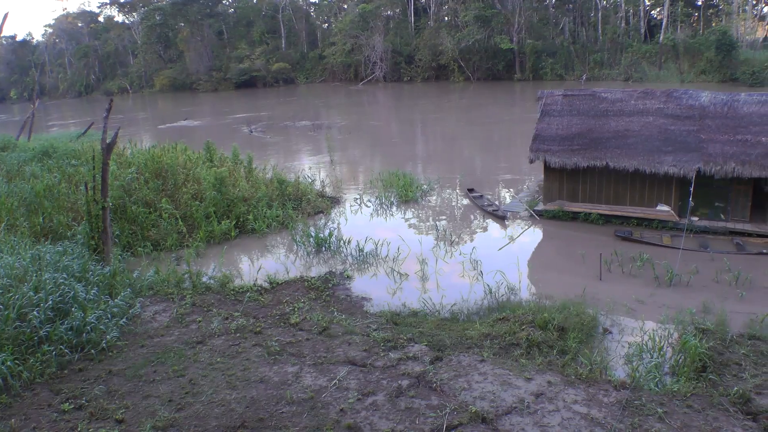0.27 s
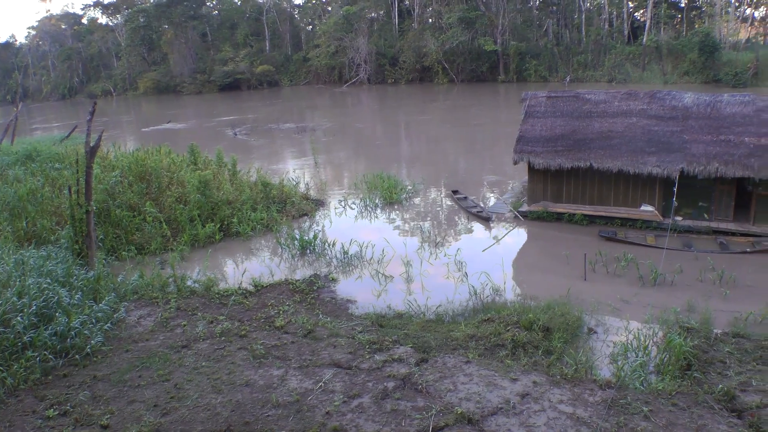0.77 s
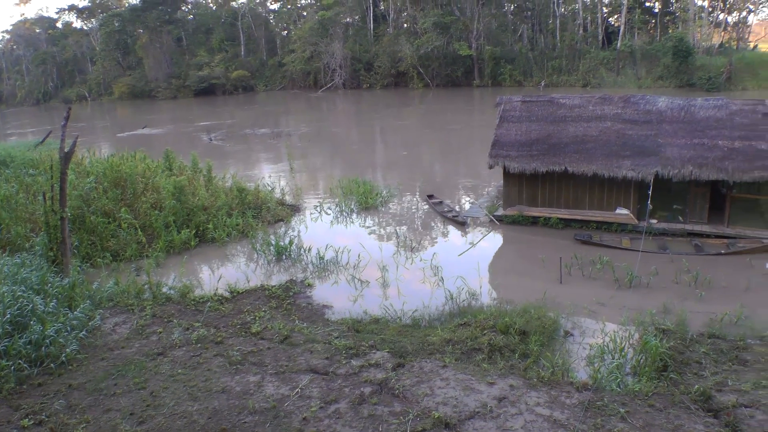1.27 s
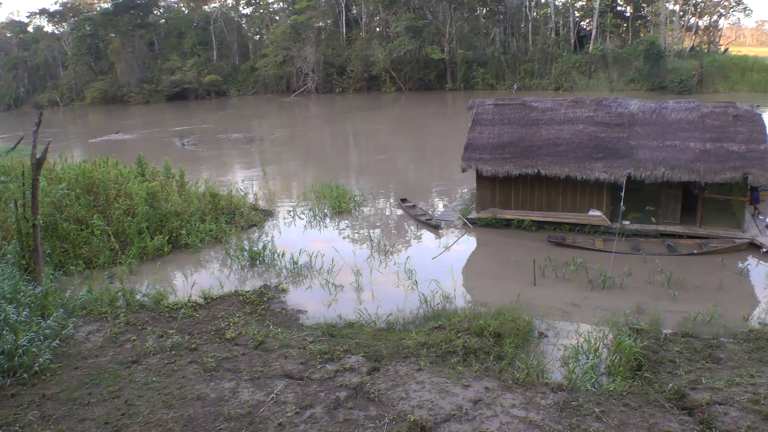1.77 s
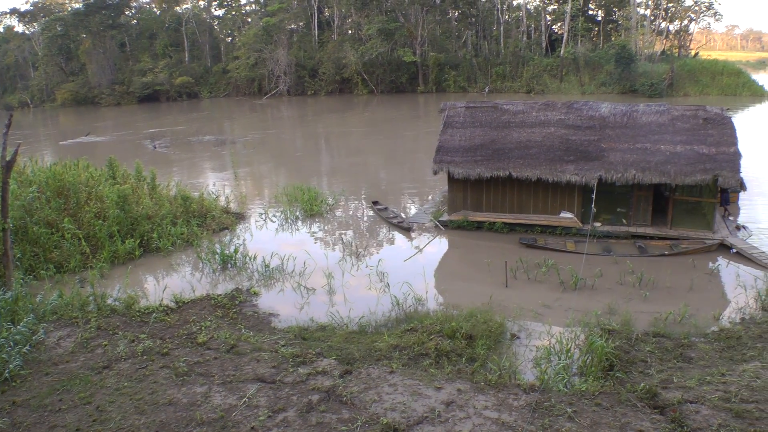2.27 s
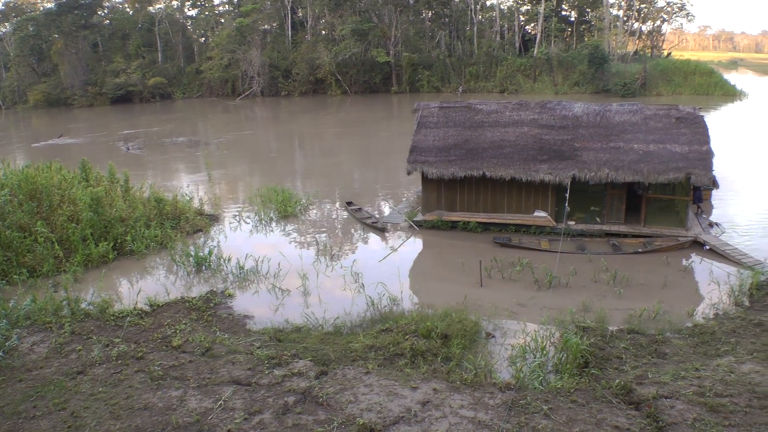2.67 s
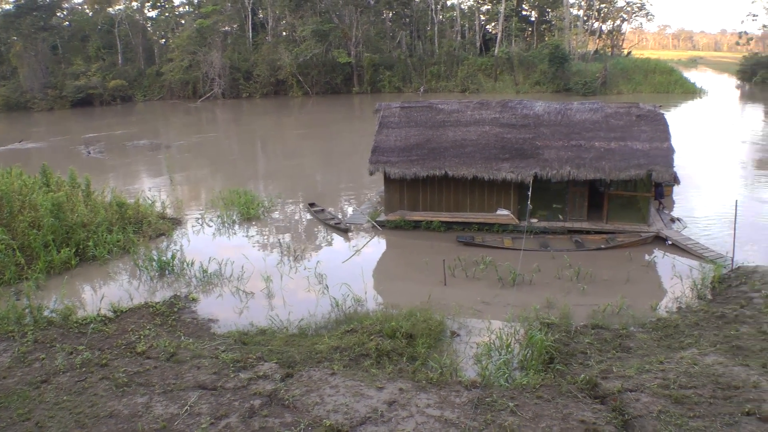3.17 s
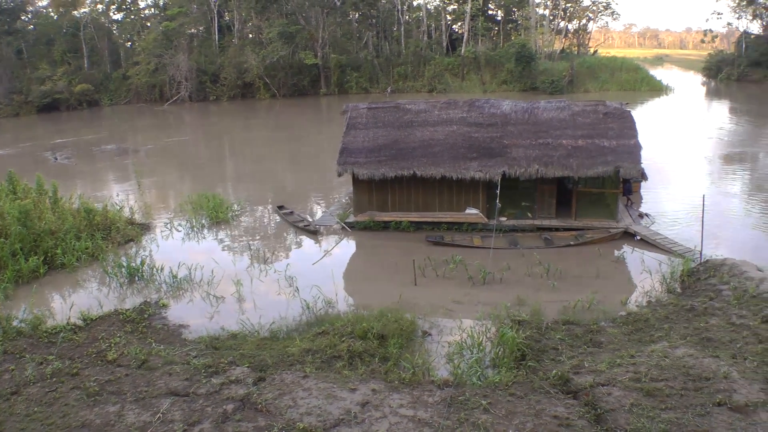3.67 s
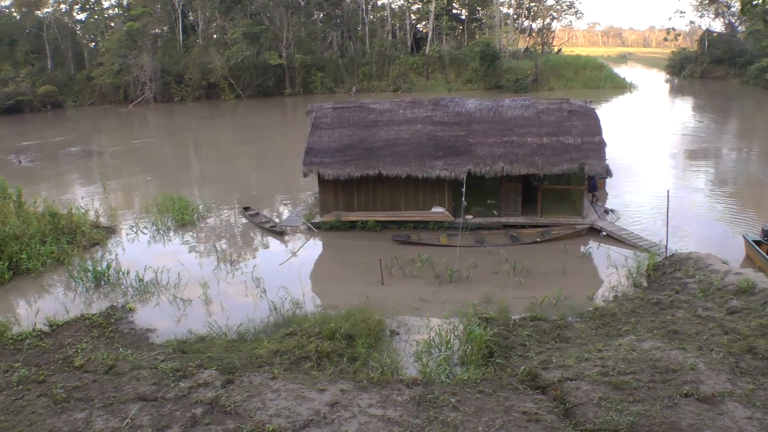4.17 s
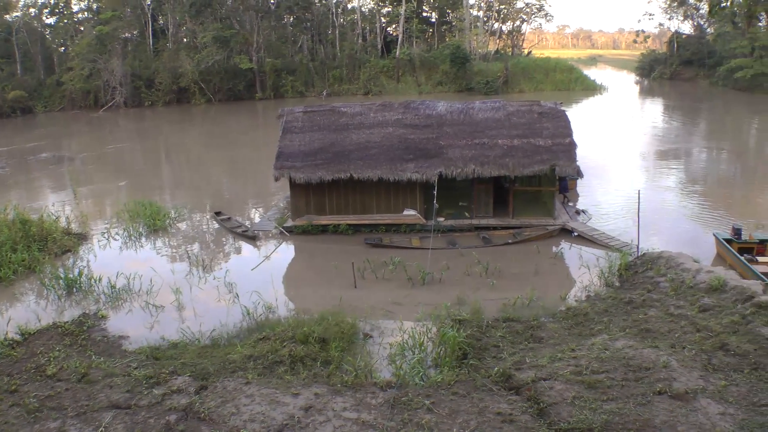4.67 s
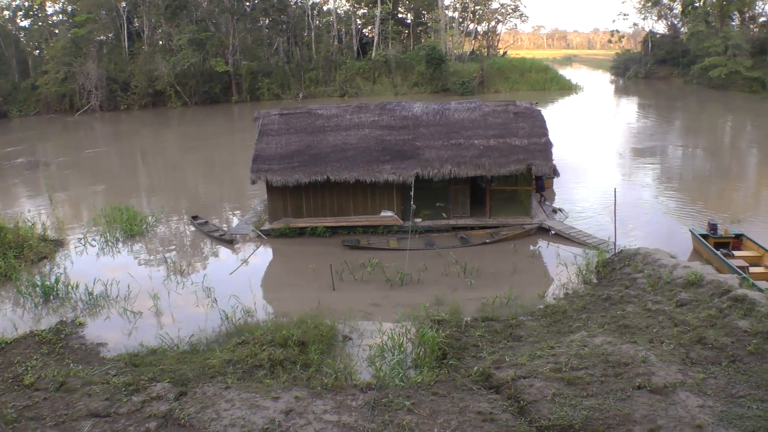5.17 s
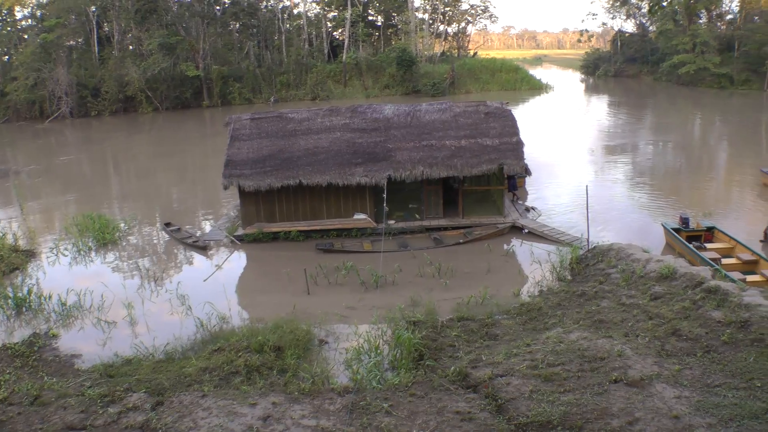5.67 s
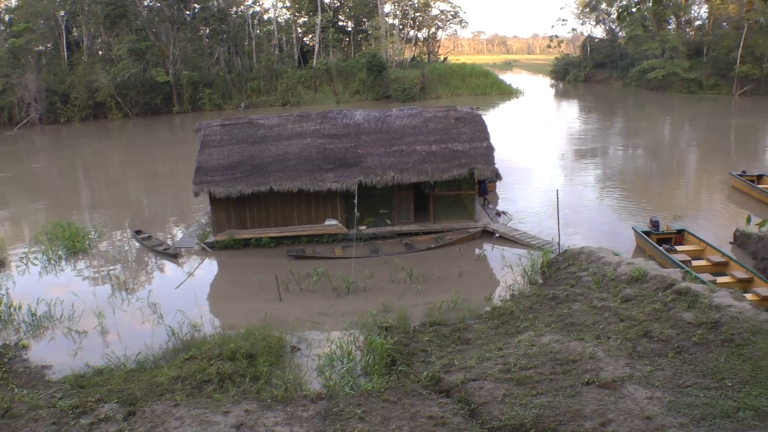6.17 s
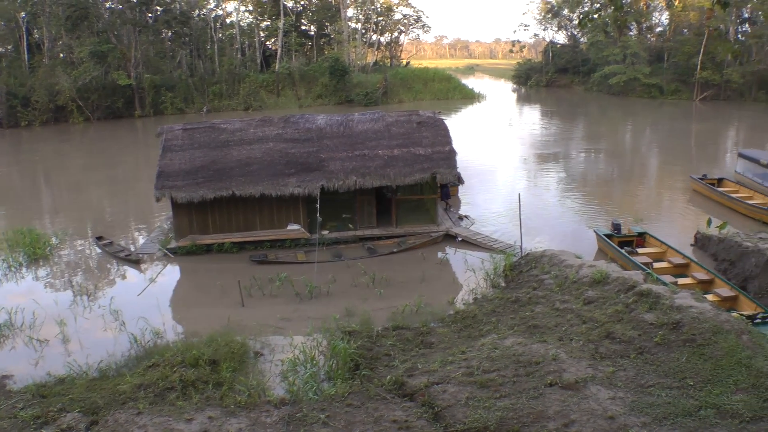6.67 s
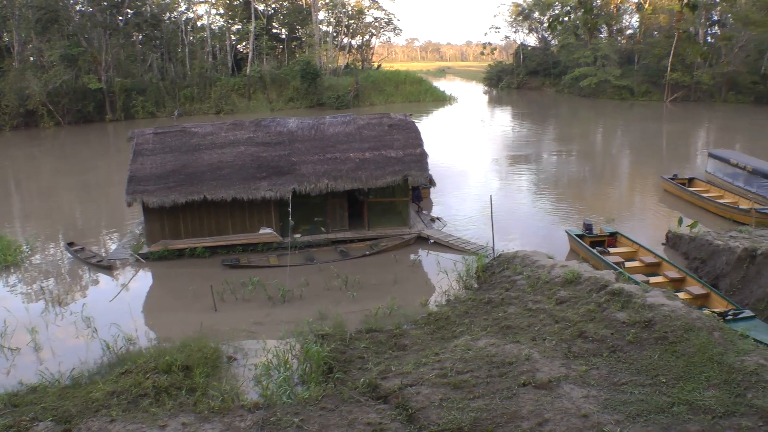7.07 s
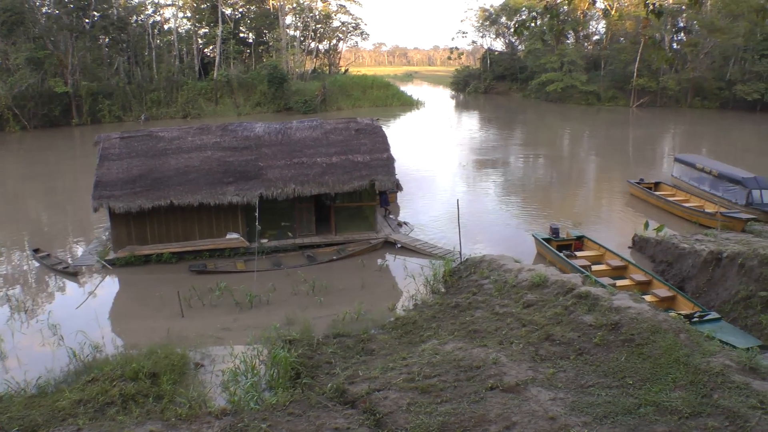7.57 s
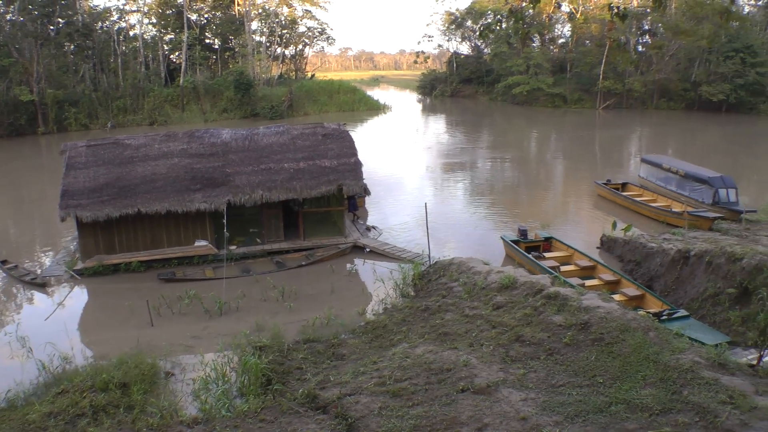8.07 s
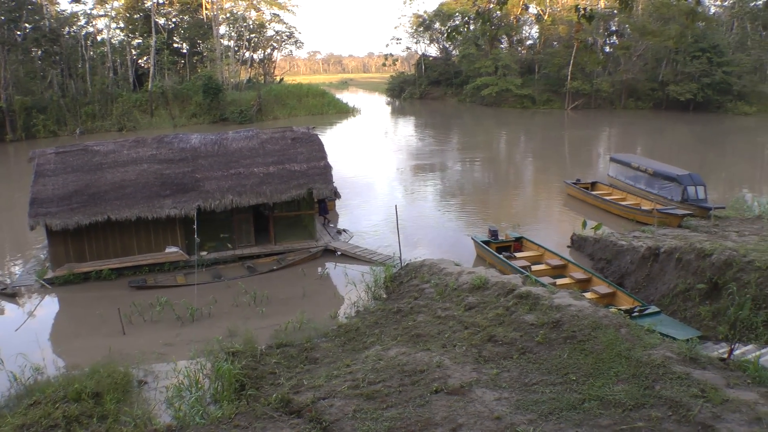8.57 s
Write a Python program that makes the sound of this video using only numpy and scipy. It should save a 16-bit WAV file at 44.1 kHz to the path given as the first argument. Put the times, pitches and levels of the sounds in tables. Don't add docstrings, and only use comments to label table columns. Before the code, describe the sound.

Dawn on a forest river bank, heard by a stereo outdoor microphone. After a brief silence, a near bird screams at 0.1 and 0.6 s, each cry sagging in pitch, then flipping up and breaking, with quick chatter and chirps around them. A falling yelp comes at 1.1, twitter at 1.7, short whistles at 2.1 and 2.4 with a bright snap between. Rough squawks, low and high, crowd 2.6-4.1, with faint trills. Tiny flock chirps fill 4.5-5.1; a croak and breathy rasps overlap from 5.1 to 6. Another squawk at 6.6, loud beak snaps and a harsh scrape at 6.7-7.0, then clear and hoarse piping and a flute-like call at 7.0-7.6. Faint peeps follow; a hoarse squawk and long fading rasp end it from 8.45. Beneath: steady high insect buzz, echoing far birds, soft air, low hum and two gentle wind gusts, at the start and 3.4.

```python
import sys
import numpy as np
from scipy import signal
from scipy.fft import rfft, irfft, next_fast_len
from scipy.io import wavfile
from scipy.ndimage import uniform_filter1d

SR = 44100
rng = np.random.default_rng(int(sys.argv[2]) if len(sys.argv) > 2 else 0)


def volts_from_decibels(level):
    exponent = np.asarray(level, float) / 20
    return 10 ** exponent


def materialize(psi):
    bounded = np.clip(np.atleast_2d(psi).T, -1, 1)
    quanta = np.round(bounded * 32767).astype(np.int16)
    wavfile.write(sys.argv[1], SR, quanta)


N = 388962

# start_s, flip_after_s, level_db, lowest_hz, lowest_at (share of the hold, 0-1)
SCREAMS = [
    (.128, .337, -27, 1131, .39),
    (.592, .353, -27.5, 1094, .45),
]
# centre_hz, lift_db
SCREAM_COLOURS = [
    (2300, -5),
    (2210, 2.5),
]
# freq_hz, level_db (per Hz)
SCREAM_THROAT = [(530, -24), (1150, -28), (1770, -11.5), (2220, -6), (2860, -9.5), (3140, -1.5), (3340, -3),
                 (3990, -7.5), (4500, 0), (5060, -4), (6820, -11.5), (11100, -26), (13300, -26.5),
                 (15500, -45)]
# start_s, length_s, peak_db, start_hz
YELP = (1.085, .115, -35, 2210)
# start_s, grace_s, length_s, level_db, held_hz
WHISTLES = [
    (2.13, 0.041, 0.118, -34, 1454),
    (2.401, 0.025, 0.129, -32.5, 1427),
]
# freq_hz, level_db (per Hz)
WHISTLE_THROAT = [(1450, -20.5), (2900, -1.5), (4350, -24), (5800, -41), (9000, -94)]
# start_s, length_s, peak_db, top_hz, roughness (0-1)
PIPES = [
    (7.043, .125, -31, 3200, .35),
    (7.278, .085, -22, 3050, .8),
]
# freq_hz, level_db (per Hz)
PIPE_THROAT = [(1500, -26.5), (2400, -1), (3050, 12), (3800, -8), (5000, 5), (6200, 7), (9300, -9),
               (14000, -30)]
# time_s, level_db, pitch_hz, roughness (0-1)
FLUTE = [(7.335, -43, 2056, .3), (7.359, -32, 1935, 0), (7.377, -21, 1926, 0.03), (7.393, -27.5, 1817, 0.3),
         (7.405, -23, 1801, 0.16), (7.422, -20, 1784, 0.04), (7.452, -30, 1754, 0.2),
         (7.47, -23.5, 1794, 0), (7.487, -24.5, 1786, 0.1)]
# time_s, level_db, pitch_hz, roughness (0-1)
FLUTE_LIFT = [(7.496, -37, 1906, 0.3), (7.523, -37.5, 1924, 0.4), (7.546, -32, 1931, 0.2),
              (7.565, -37, 1866, .14), (7.585, -60, 1720, .1)]
# time_s, level_db, pulse_rate_hz, roughness (0-1)
SQUAWKS = [
    [(2.621, -40, 529, 0), (2.64, -33, 789, 0.1), (2.665, -27, 878, 0.15), (2.69, -29.5, 922, 0.8),
     (2.735, -34.5, 876, 1), (2.77, -53, 870, 0.4)],
    [(3.058, -36, 310.7, 0.2), (3.072, -32, 390, 0.06), (3.09, -25, 459, 0.2), (3.118, -28.5, 478.7, 0.42),
     (3.142, -29, 292, 0.5)],
    [(3.143, -33, 862, .6), (3.18, -32.5, 1148, 0.55), (3.197, -31, 1171, 0.66), (3.235, -32.5, 822, 0.94),
     (3.255, -38, 796, 0.43), (3.28, -36, 907, 0.54), (3.325, -45, 946, 0.64)],
    [(3.39, -35, 352, 0.04), (3.41, -30.5, 473, 0.31), (3.46, -25, 477, 0.54), (3.478, -29, 468, 0.9)],
    [(3.47, -25.5, 339, 0.77), (3.51, -25, 353.7, 0.75), (3.555, -26.5, 359, 0.82), (3.585, -36, 297, 0.7),
     (3.62, -42, 235, .5)],
]
# time_s, level_db, pulse_rate_hz, roughness (0-1)
LATE_SQUAWKS = [
    [(3.798, -45, 398.6, 0.4), (3.82, -28, 468, 0.34), (3.855, -23, 477.4, 0.56), (3.9, -33.5, 414, 0.83),
     (3.93, -38, 394, 0.4)],
    [(3.99, -34, 560, 0.1), (4.015, -26.5, 1037, 0.33), (4.04, -27, 1301, 0.67), (4.07, -33.5, 1186, 0.43),
     (4.09, -39, 1044, 0.5), (4.11, -48, 830, 0.5)],
    [(5.991, -37, 481, 0.4), (5.997, -33, 521, 0.5), (6.08, -44.5, 450, 0.5), (6.17, -41, 341, 0)],
    [(6.565, -44, 712, 0.3), (6.585, -34, 877, 0.07), (6.605, -33.5, 1000, 0.63), (6.65, -35, 1023, 0.8),
     (6.715, -39, 998, 0.96)],
    [(8.452, -42, 471, 0.77), (8.459, -37, 558.4, 0.76), (8.49, -29.5, 698, 0.8), (8.53, -29, 704, 0.74),
     (8.59, -37, 714, 0.7), (8.68, -48, 717, .5)],
]
# centre_hz, lift_db
SQUAWK_COLOURS = [(3100, 5.5), (3020, 3), (2300, 1), (2300, 0), (2500, 1.5), (2900, 1.5), (2500, 3),
                  (2500, -2.5), (3000, 3), (2950, 6)]
# freq_hz, level_db (per Hz)
SQUAWK_THROAT = [(350, -46), (600, -21.5), (716, -26), (1010, -27.5), (1390, -14.5), (1530, -19),
                 (1730, -4), (2440, 0), (2950, -1), (3470, -0.5), (3980, -7.5), (5660, -7), (9500, -18),
                 (14100, -33), (15500, -46)]
# start_s, length_s, level_db, start_hz, end_hz
TRILLS = [
    (3.705, 0.11, -40.5, 1312, 1183),
    (3.948, 0.05, -41.5, 1294, 1243),
    (4.25, .145, -44, 1301, 1170),
    (6.396, 0.22, -42, 2340, 2250),
]
# freq_hz, level_db (per Hz)
TRILL_THROAT = [(1250, -6), (2500, 7), (3750, 1.5), (5000, 6.5), (6300, -10), (9000, -31), (13000, -40)]
# start_s, length_s, peak_db, throat_hz, peak_at (share of the length, 0-1)
RASPS = [(4.803, 0.1, -42, 3800, 0.37), (7.302, 0.098, -28.5, 2980, 0.24), (5.061, .4, -36, 3330, 0.26),
         (5.45, 0.24, -31, 3200, 0.4), (5.38, .29, -35, 4120, .4), (5.813, 0.21, -33.5, 3220, 0.21),
         (8.5, 0.77, -32.5, 3190, 0.032), (1.685, 0.23, -47, 3770, 0.37), (7.309, .03, -25, 2970, 0.46)]
# time_s, level_db
CROAK = [(5.2, -43.5), (5.314, -38), (5.51, -37.5)]
# freq_hz, level_db (per Hz)
CROAK_THROAT = [(590, -66), (1000, -24), (1540, -27), (1930, 1.5), (2340, 0), (3940, 0), (6270, -9),
                (7020, -17), (7770, -19), (8710, -19), (15000, -42)]
# time_s, level_db
SCRAPE = [(6.73, -36), (6.948, -29), (7.01, -50)]
# freq_hz, level_db (per Hz)
SCRAPE_THROAT = [(290, -57), (500, -31), (726, -6), (888, -23.5), (1130, -8.5), (1530, -11.5), (1800, -8.5),
                 (2500, -16), (3430, 2), (4840, -2), (6640, -3.5), (8240, -16), (10000, -16.5),
                 (14000, -28), (15500, -48)]
# time_s, peak_db
CHATTER = [(.231, -35), (0.254, -35), (0.27, -31), (.289, -37), (0.305, -26.5), (0.322, -36),
           (0.334, -26.5)]
# start_hz, end_hz, length_s
CHATTER_NOTE = (2500, 1100, 0.017)
# time_s, peak_db
PEEPS = [(7.654, -59), (7.8, -59), (7.925, -57), (8.065, -53.5), (8.199, -57)]
# start_hz, end_hz, length_s
PEEP_NOTE = (1515, 1200, 0.0473)
# time_s, peak_db, start_hz, end_hz
TWITTER = [(1.708, -36, 2700, 2850), (1.713, -37, 4680, 4550), (1.726, -31.5, 4170, 3380),
           (1.75, -32, 4700, 4270), (1.781, -30, 3750, 3470), (1.8, -34.5, 2570, 2300),
           (1.814, -34, 4980, 3570)]
# time_s, peak_db, start_hz, end_hz, length_s
GULPS = [(0.367, -44.5, 932, 937, 0.086), (1.127, -49, 802, 786, 0.031), (4.31, -47, 200, 187, 0.037),
         (4.463, -44.5, 248, 298, 0.024), (4.964, -48.5, 392, 473, 0.028), (5.091, -42, 600, 455, 0.018),
         (5.489, -48, 899, 972, 0.075), (5.667, -50, 396, 485, 0.032), (5.771, -40.5, 582, 598, 0.028),
         (6.022, -42, 960, 740, 0.035)]
# time_s, peak_db, start_hz, end_hz, length_s
CHIRPS = [(0.357, -34.5, 1720, 910, 0.017), (.376, -45, 1500, 880, 0.014), (0.444, -26, 1350, 1875, 0.032),
          (.468, -41, 1900, 1300, 0.011), (.478, -30, 1812, 1296, 0.052), (.515, -53, 1300, 622, 0.025),
          (.525, -39, 1490, 1335, 0.023), (1.093, -35, 6600, 6000, 0.029), (1.115, -32, 6050, 4950, 0.022),
          (2.35, -42, 4290, 2390, 0.02), (.922, -25.5, 1400, 1840, .04), (5.72, -45.5, 4740, 4840, 0.091),
          (5.872, -48, 1780, 1910, 0.052), (5.975, -28, 4220, 1840, .028), (5.992, -35, 2134, 978, .036),
          (6.541, -42, 3110, 3050, 0.1), (7.17, -47, 4420, 5530, .06), (8.35, -49.5, 3970, 5300, 0.067)]
# time_s, peak_db, start_hz, end_hz, length_s
FLOCK = [(4.488, -45, 4000, 4000, .02), (4.503, -40.5, 4420, 4650, 0.022), (4.516, -33, 4630, 4320, 0.015),
         (4.52, -42, 3550, 3400, 0.05), (4.553, -45, 2750, 2630, 0.051), (4.581, -37, 3780, 3500, 0.024),
         (4.604, -42, 5050, 3900, 0.0363), (4.741, -46.5, 2900, 2770, 0.058),
         (4.785, -39, 4030, 3750, 0.024), (4.802, -33, 3770, 4160, 0.019),
         (4.817, -31.5, 4150, 3980, 0.019), (4.952, -36.5, 3490, 3620, 0.021),
         (4.968, -39, 3380, 3250, 0.023), (4.98, -37, 4100, 4440, 0.018), (5.085, -34, 4070, 3780, 0.031)]
# time_s, peak_db, start_hz, end_hz,
# length_s
STREAKS = [(3.063, -28, 1756, 2330, 0.018), (3.105, -32, 2866, 2850, .02), (3.12, -33, 2930, 1754, .027),
           (3.196, -36, 2366, 1640, 0.046), (3.5, -29, 2420, 2500, 0.05), (3.553, -31, 2524, 2080, 0.038),
           (3.58, -36, 2120, 1690, 0.033), (3.843, -26.5, 2970, 2480, 0.057),
           (4.036, -36, 2610, 2280, 0.044), (4.074, -42.5, 2347, 1710, .037),
           (6.566, -41, 1445, 1960, 0.038), (7.102, -36.5, 6280, 4300, 0.033),
           (7.133, -40, 4480, 3460, .03), (0.244, -35, 5020, 5110, 0.093), (3.165, -34, 2230, 2320, 0.031),
           (7.545, -34.5, 3840, 3470, .03), (7.56, -52, 1874, 1843, .12), (7.58, -56.5, 1865, 1792, .45),
           (7.51, -42, 2980, 2950, .03), (2.565, -45, 4110, 4110, .05), (1.1, -34, 4250, 4010, 0.038),
           (1.25, -47, 1854, 1804, .05), (7.753, -62, 3430, 3387, 0.54),
           (3.993, -32, 1450, 3250, .034), (4.008, -32, 1900, 2250, .016), (4.05, -38, 3950, 3650, .04),
        (3.812, -32, 3150, 3350, .045), (3.82, -31, 2350, 2400, .07), (3.25, -34, 1620, 1800, .06),
        (3.072, -33, 2800, 3600, .04), (7.31, -33, 6150, 6300, .028)]
# time_s, peak_db, ring_hz
SNAPS = [
    (2.3521, -17, 6050),
    (6.7195, -13.5, 4590),
    (6.7364, -19, 3280),
    (6.7396, -20, 4670),
    (6.758, -23, 6060),
]
# time_s, level_db
FAR_DB = [(0.13, -121), (0.32, -37), (1.97, -47), (3.81, -40), (4.61, -42), (5.26, -35), (8.38, -54.5),
          (8.82, -36)]
# freq_hz, t60_s
TREES = [(500, 0.51), (1800, 0.2), (3500, 0.35), (7000, 0.39), (14000, 0.17)]
# time_s, smooth_choir_db, throbbing_choir_db, throb_depth (0-1)
INSECTS = [(0.13, -123, -136, 0.6), (0.32, -56, -51, 0.6), (1.07, -45, -50.5, 0.6), (8.82, -45.5, -50, 0.6)]
# freq_hz, level_db (per Hz)
AIR = [(250, -8.5), (450, -26), (775, -16), (1000, -27.5), (1500, -19), (1850, -13.5), (3300, -15),
       (5100, -12.5), (7500, -11), (7950, -22.5), (8900, -29.5), (9300, -29), (14000, -30.5), (15600, -40)]
# freq_hz, level_db (per Hz)
HUM = [(12, -18), (20, -24), (114, -1.5), (139, 4.5), (177, 5.5), (223, -6.5), (265, 7.5), (304, 2),
       (500, -7.5), (650, -4.5), (1100, -120)]
# time_s, level_db
HUM_DB = [(.13, -54), (2.8, -59), (4.6, -53), (8.82, -59)]
# freq_hz, left_right_likeness (-1 to 1)
SAME = [(25, -1.1), (60, 0.68), (250, 0.55), (600, 0.4), (1700, 0.82), (5000, 0.71), (15000, 0.84)]
# freq_hz, left_over_right_db
LEAN = [(60, -1), (600, -2), (5000, -1), (15000, -3)]
# start_s, length_s, level_db
GUSTS = [
    (0.118, 0.95, -48.5),
    (3.35, 0.66, -53),
]
# freq_hz, left_lead_rad
PORTS = [(1200, 0.72), (2700, 0.41), (6200, -0.78), (8500, 1), (9500, 0)]


def evened(x):
    return x / np.sqrt(np.mean(x ** 2) + 1e-20)


def read(points, hz):
    f, value = np.transpose(points)
    return np.interp(np.log(hz + 1), np.log(f + 1), value)


def unroll(rows):
    s, *columns = np.transpose(rows)
    t = np.arange(s[0], s[-1], 1 / SR)
    return t, [np.interp(t, s, c) for c in columns]


def along(rows):
    s, *columns = np.transpose(rows)
    return [np.interp(np.arange(N) / SR, s, c) for c in columns]


def swell(start, length, peak):
    t = np.arange(start, start + length, 1 / SR)
    u = (t - start) / length
    peak = np.clip(peak, .01, .99)
    return t, np.maximum(1 - u / peak, 0), np.maximum(u - peak, 0) / (1 - peak)


def add(mix, t, sound, lean_db, edge=600):
    at = round(t[0] * SR)
    sides = volts_from_decibels(np.multiply.outer([.5, -.5], lean_db * np.ones(len(sound))))
    fade = signal.windows.tukey(len(sound), min(edge / len(sound), 1))
    part = mix[:, at:at + len(sound)]
    part += (sides * sound * fade)[:, :part.shape[1]]


def wander(size, per_s):
    knots_per_s = 400
    knots = rng.standard_normal(int(size / SR * knots_per_s) + 400)
    span = int(200 / per_s) + 1
    smooth = evened(uniform_filter1d(uniform_filter1d(knots, span), span))
    return np.interp(np.arange(size) / SR * knots_per_s, np.arange(len(knots)), smooth)


def tinted(throat, centre_hz, db, octaves=0.34):
    return [(f, level + db * np.exp(-(np.log2(f / centre_hz) / octaves) ** 2)) for f, level in throat]


def coloured(x, throat):
    size = next_fast_len(len(x) + 512)
    gain = volts_from_decibels(read(throat, np.fft.rfftfreq(size, 1 / SR)))
    return evened(irfft(rfft(x, size) * gain, size)[:len(x)])


def resonate(x, hz, width_hz):
    turn = np.exp(2j * np.pi * np.cumsum(hz * np.ones(len(x))) / SR)
    r = np.exp(-np.pi * width_hz / SR)
    return 2 * (turn * signal.lfilter([1 - r], [1, -r], x / turn)).real


def voice(hz, rough, throat, flutter_db, weak=0, jitter=0.0076, clear_hz=16000., scatter=1):
    turns = np.cumsum(hz * (1 + jitter * wander(len(hz), 120))) / SR
    tone, power = 0, 1e-12
    for k in np.arange(1, 29) / 2:
        half = k % 1 > 0
        if half and not np.any(weak) or k * np.min(hz) > clear_hz * 2:
            continue
        gain = volts_from_decibels(read(throat, k * hz)) * (k * hz < 16000)
        if half:
            gain = gain * np.clip(weak, 0, 1)
        clear = 1 / (1 + (k * hz / clear_hz) ** 4)
        flutter = volts_from_decibels(flutter_db * wander(len(hz), 45))
        tone += clear * gain * flutter * np.cos(2 * np.pi * (k * turns + scatter * rng.random()))
        power += gain ** 2 / 2
    puffs = 0.3 + np.exp(-(turns / 2 % 1) / 0.16)
    breath = coloured(puffs * rng.standard_normal(len(hz)), throat)
    rough = np.clip(rough, 0, 1)
    return np.sqrt(1 - rough) * tone / np.sqrt(power) + np.sqrt(rough) * breath


def pulses(size, per_s, uneven_db, hiss):
    turns = np.cumsum(per_s * (1 + .2 * wander(size, 100))) / SR
    height = volts_from_decibels(uneven_db * wander(size, 150))
    clicks = np.diff(np.floor(turns), prepend=0) * height
    return evened(clicks) + hiss * height * np.exp(-(turns % 1) / .5) * rng.standard_normal(size)


def screams():
    mix = np.zeros((2, N))
    bow_hz_per_s2, flip_hz, flip_s, dying_s = 2200., 529.5, .0138, .05
    for (start, hold, db, low_hz, low), colour in zip(SCREAMS, SCREAM_COLOURS):
        t = np.arange(start, start + hold + dying_s, 1 / SR)
        left = np.maximum(start + hold - t, 0)
        gone = np.maximum(t - start - hold, 0) / dying_s
        flip = np.exp(-left / flip_s)
        hz = low_hz + bow_hz_per_s2 * (hold - left - low * hold) ** 2 + flip_hz * flip - 60. * gone
        rough = .11 + .4 * np.sin(np.pi * flip ** .7) ** 2 + .35 * flip + .5 * gone
        level_db = db + 4.5 * np.minimum(2 * flip, 1) - 24. * gone
        throat = tinted(SCREAM_THROAT, *colour)
        cry = voice(hz, rough ** 2, throat, 3., jitter=.003, clear_hz=15000.)
        add(mix, t, volts_from_decibels(level_db) * cry, -2.6, edge=160)
    return mix


def yelp():
    mix = np.zeros((2, N))
    start, length, db, start_hz = YELP
    t, before, after = swell(start, length, 0.25)
    hz = start_hz * (0.9 + 0.07 * np.exp(-(t - t[0]) / 0.031))
    cry = voice(hz, 0.23 + 1.4 * np.sqrt(after), SCREAM_THROAT, 6.2, clear_hz=15000.)
    add(mix, t, volts_from_decibels(db - 2.1 * before - 9.3 * after) * cry, -2.6)
    return mix


def whistles():
    mix = np.zeros((2, N))
    grace_pitch = 1.19
    for s, grace, length, db, hz in WHISTLES:
        t, (level_db, pitch) = unroll([
            (s, -16, 1.08), (s + 0.0081, -5, grace_pitch), (s + 0.73 * grace, -15.5, grace_pitch - .04),
            (s + grace, 0, 1), (s + length - .02, 0, 1), (s + length, -10, .97)])
        tone = voice(hz * pitch, 0.0028, WHISTLE_THROAT, 3.2, clear_hz=9000.)
        add(mix, t, volts_from_decibels(db + level_db) * tone, -1.6)
    return mix


def pipes():
    mix = np.zeros((2, N))
    fall_hz_per_s, scoop = 33000., 0.15
    for start, length, db, top_hz, rough in PIPES:
        t, before, after = swell(start, length, 0.38)
        fall_hz = fall_hz_per_s * (1 - rough) * .58 * length * after ** 1.3
        hz = top_hz * (1 - scoop * rough * before ** 2) - fall_hz
        level_db = db - 24. * rough * before ** 1.5 - 16. * after ** 1.3
        tone = voice(hz, rough ** 2, PIPE_THROAT, 1.6 + 3 * rough, jitter=.04 * rough ** 2, clear_hz=8500.)
        add(mix, t, volts_from_decibels(level_db) * tone, -2.3)
    return mix


def flute():
    mix = np.zeros((2, N))
    rest_hz, beat_hz, beat_depth = 1785., 84., .3
    t, (db, hz, rough) = unroll(FLUTE + FLUTE_LIFT)
    turns = np.cumsum(hz * (1 + 0.0073 * wander(len(t), 100))) / SR
    raised = abs(hz - rest_hz)
    second_db = np.minimum(-30. + .22 * raised, 8.) - 14.0 * (t < 7.485)
    third_db = -7. - .25 * np.maximum(raised - 45., 0)
    third_db = third_db - 60. * np.maximum(t - 7.44, 0) - 20 * (t > 7.494)
    third_db = np.maximum(third_db, -30.)
    fifth_db = np.maximum(third_db - 38, second_db - 26.0)
    shares_db = [0, second_db, third_db, third_db - 14.0, fifth_db, third_db - 25.0, third_db - 27.]
    tone = 0
    for k, share_db in enumerate(shares_db):
        flutter_db = (1. + .5 * k) * wander(len(t), 50 + 40 * k)
        tone = tone + volts_from_decibels(share_db + flutter_db) * np.cos(2 * np.pi * (k + 1) * turns)
    tone = tone * (1 + beat_depth * np.cos(2 * np.pi * beat_hz * (t - 7.472)))
    breath = rough * coloured(rng.standard_normal(len(t)), PIPE_THROAT)
    add(mix, t, volts_from_decibels(db) * (np.sqrt(2) * tone + breath), -1.6)
    return mix


def squawks():
    mix = np.zeros((2, N))
    for rows, colour in zip(SQUAWKS + LATE_SQUAWKS, SQUAWK_COLOURS):
        t, (db, hz, rough) = unroll(rows)
        rough = np.clip(rough, 0, 1)
        throat = tinted(SQUAWK_THROAT, *colour)
        cry = voice(2 * hz, rough ** 1.9, throat, 3.5, 1, .006 + .022 * rough, clear_hz=4200., scatter=.35)
        add(mix, t, volts_from_decibels(db) * cry, -2.8)
    return mix


def trills():
    mix = np.zeros((2, N))
    for start, length, db, start_hz, end_hz in TRILLS:
        t, before, after = swell(start, length, 0.43)
        throb = np.sin(np.pi * 58. * (t - t[0])) ** 4
        hz = np.linspace(start_hz, end_hz, len(t))
        tone = voice(hz, .28, TRILL_THROAT, 2., jitter=.018, clear_hz=6000.)
        add(mix, t, volts_from_decibels(db + 9 - 2.5 * before - 4. * after) * throb * tone, -2.1)
    return mix


def rasps():
    mix = np.zeros((2, N))
    for start, length, db, throat_hz, peak in RASPS:
        t, before, after = swell(start, length, peak)
        hz = throat_hz * (1 + .03 * before - .05 * after)
        drive = pulses(len(t), 210., 1.2, 6.)
        throat = evened(resonate(resonate(drive, hz, 850.), hz, 1200.))
        rasp = evened(throat + volts_from_decibels(-8) * coloured(drive, CROAK_THROAT))
        add(mix, t, volts_from_decibels(db - 6 * before - 11.5 * after) * rasp, -2.3)
    return mix


def croak_and_scrape():
    mix = np.zeros((2, N))
    # path, throat, trim_db, pulse_rate_hz, beak_hz, beak_share
    calls = [(CROAK, CROAK_THROAT, 4.5, 110., 1900., .1), (SCRAPE, SCRAPE_THROAT, .3, 240., 4750., .4)]
    for rows, throat, trim_db, per_s, ring_hz, ring in calls:
        t, (db,) = unroll(rows)
        drive = pulses(len(t), per_s, 1.0, 30.0)
        beak = ring * evened(resonate(resonate(drive, ring_hz, 500.), ring_hz, 700.))
        add(mix, t, volts_from_decibels(db + trim_db) * evened(coloured(drive, throat) + beak), -2.4)
    return mix


def small_notes():
    mix = np.zeros((2, N))
    rows = [row + CHATTER_NOTE for row in CHATTER] + [row + PEEP_NOTE for row in PEEPS]
    rows += [(s, db - 5., start_hz, end_hz, .028) for s, db, start_hz, end_hz in TWITTER]
    for s, db, start_hz, end_hz, length in rows + GULPS + CHIRPS + FLOCK + STREAKS:
        t = np.arange(0, length, 1 / SR)
        bend = (t / length) ** min(np.sqrt(end_hz / start_hz), 1)
        hz = start_hz * (end_hz / start_hz) ** bend
        breath = resonate(rng.standard_normal(len(t)), hz, 0.18 * start_hz)
        hoarse = evened(resonate(breath, hz, 430.0))
        tone = np.sin(2 * np.pi * np.cumsum(hz) / SR) + .38 * hoarse
        lean_db = -5.5 if start_hz < 1000 else -3.1
        add(mix, s + t, volts_from_decibels(db) * np.sqrt(np.sin(np.pi * t / length)) * tone, lean_db)
    return mix


def beak_snaps():
    mix = np.zeros((2, N))
    t = np.arange(700) / SR
    for s, db, hz in SNAPS:
        tick = coloured(rng.standard_normal(len(t)), SCRAPE_THROAT)
        envelope = np.exp(-t / 0.0012) * (1 - np.exp(-t / 0.00051))
        snap = envelope * (np.sin(2 * np.pi * hz * t) + 0.5 * tick)
        add(mix, s - .007 + t[:1], volts_from_decibels(db - 2.5) * np.pad(snap, 310), -2.2)
    return mix


def far_birds(count=2600):
    mix = np.zeros(N + SR)
    for s, pitch, glide, length, size in rng.random((count, 5)):
        t = np.arange(0, 0.01185 + 0.029 * length, 1 / SR)
        hz = 2000 * 2.5 ** pitch * np.linspace(1, .84 + .3 * glide, len(t))
        chirp = volts_from_decibels(3 * size) * np.hanning(len(t)) * np.sin(2 * np.pi * np.cumsum(hz) / SR)
        mix[round(N * s):][:len(t)] += chirp
    return volts_from_decibels(along(FAR_DB)[0] - 6.5) * evened(mix[:N])


def trees(x):
    taps = np.zeros((2, 32000))
    at = np.arange(120, 31980, 20) + rng.integers(0, 20, (2, 1593))
    np.put_along_axis(taps, at, rng.choice([-1., 1.], at.shape), 1)
    taps[1] = taps[0] + 0.48 * taps[1]
    hz, t, z = signal.stft(taps, SR, nperseg=256)
    fade_db = -60 * t / np.maximum(read(TREES, hz), .05)[:, None]
    fade = volts_from_decibels(fade_db) + volts_from_decibels(fade_db / 3 - 19)
    tail = signal.istft(z * fade, SR, nperseg=256)[1]
    tail = tail / np.linalg.norm(tail, axis=1, keepdims=True)
    return signal.fftconvolve(x[None], tail, axes=1)[:, :N] * volts_from_decibels([[-1.2], [1.2]])


def wash(spectrum, patchy_db):
    frames, hz = N // 512 + 3, np.fft.rfftfreq(1024, 1 / SR)
    a, b, c, d, patches = rng.standard_normal((frames, 513, 5)).T
    patches = evened(uniform_filter1d(uniform_filter1d(patches, size=6, axis=0), size=5, axis=1))
    same = np.clip(read(SAME, hz), -1, 1)[:, None]
    left = a + 1j * b
    right = same * left + np.sqrt(1 - same ** 2) * (c + 1j * d)
    lean_db = np.multiply.outer([.5, -.5], read(LEAN, hz))[..., None]
    z = np.array([left, right]) * volts_from_decibels(spectrum(hz)[:, None] + patchy_db * patches + lean_db)
    return evened(signal.istft(z, window="cosine", nperseg=1024, noverlap=512)[1][:, :N])


def hump(centre_hz, width_hz):
    return lambda hz: np.maximum(-6 * (2 * (hz - centre_hz) / width_hz) ** 2, -90)


def insects():
    smooth_db, throb_db, depth = along(INSECTS)
    strokes = np.cumsum(52.6 * (1 + 0.011 * wander(N, 1.25))) / SR
    beat = np.cos(2 * np.pi * strokes) + 0.1 * np.cos(4 * np.pi * strokes)
    throb = 1 + np.clip(depth, 0, 1) * beat
    smooth_choir = volts_from_decibels(smooth_db) * wash(hump(5830.0, 680.0), 1.8)
    return smooth_choir + volts_from_decibels(throb_db) * throb * wash(hump(6874.0, 630.0), 0.62)


def open_air():
    return volts_from_decibels(-48.5) * wash(lambda hz: read(AIR, hz), 3.3)


def low_hum():
    return volts_from_decibels(along(HUM_DB)[0]) * wash(lambda hz: read(HUM, hz), 2.87)


def wind():
    mix = np.zeros((2, N))
    lowpass = signal.butter(2, 48.4, fs=SR, output="sos")
    lumps = signal.sosfilt(lowpass, rng.standard_normal((2, N)))
    for start, length, db in GUSTS:
        t = np.arange(start, start + length, 1 / SR)
        mix[:, round(start * SR):][:, :len(t)] += volts_from_decibels(db) * signal.windows.tukey(len(t), .4)
    return mix * evened(lumps)


def ports(x):
    turn = np.exp(.5j * read(PORTS, np.fft.rfftfreq(N, 1 / SR)))
    return irfft(rfft(x, axis=1) * np.array([turn, 1 / turn]), N, axis=1)


def scene():
    near = screams() + yelp() + whistles() + squawks() + trills() + rasps() + croak_and_scrape()
    near = near + small_notes() + beak_snaps()
    close = flute() + pipes()
    far = far_birds()
    echoes = trees(volts_from_decibels(-3.5) * near.mean(0) + volts_from_decibels(-9) * close.mean(0) + far)
    birds = ports(near + close + volts_from_decibels(-11.5) * far + echoes)
    return birds + insects() + open_air() + low_hum() + wind()


def thinned(x, margin_db):
    mid_side = np.array([x[0] + x[1], x[0] - x[1]]) / 2
    hz, t, z = signal.stft(mid_side, SR, nperseg=2048)
    hz = hz[:, None]
    power = abs(z[0]) ** 2
    band_db = 10 * np.log10(uniform_filter1d(power, size=21, axis=0) + 1e-20)
    fine_db = 10 * np.log10(uniform_filter1d(power, size=6, axis=0) + 1e-20)
    slope_db = .004 * hz
    mask_db = np.maximum.accumulate(band_db + slope_db, axis=0) - slope_db
    hidden = (band_db < mask_db + margin_db) | (fine_db < band_db - .8)
    z = z * np.where((hz > 7800) & hidden, volts_from_decibels(-30), 1)
    z[1] *= 1 / (1 + (hz / 10300) ** 16) + 0.041
    top_hz = np.where(band_db[690] > -99., 15800, 15050)
    mid, side = signal.istft(z * (hz < top_hz), SR, nperseg=2048)[1][:, :N]
    return np.array([mid + side, mid - side])


def band_limit(x):
    return signal.sosfilt(signal.butter(12, 15960, fs=SR, output="sos"), x)


def record(dry):
    start_s = .1285
    return band_limit(thinned(dry, -23.5) * (np.arange(N) >= start_s * SR))


dry = scene()
out = record(dry)
materialize(out)
```